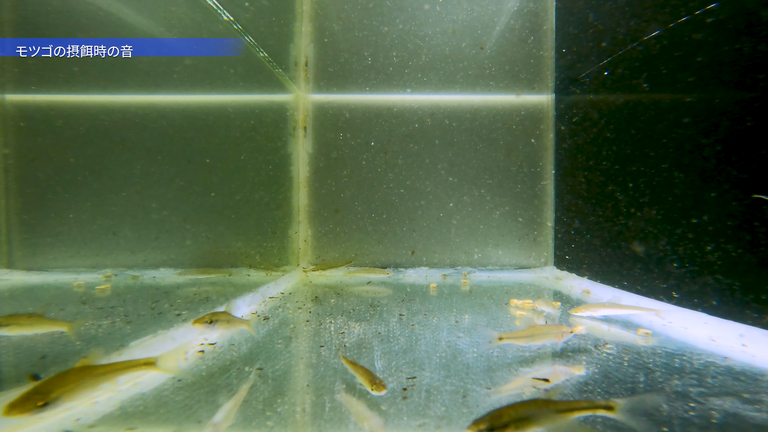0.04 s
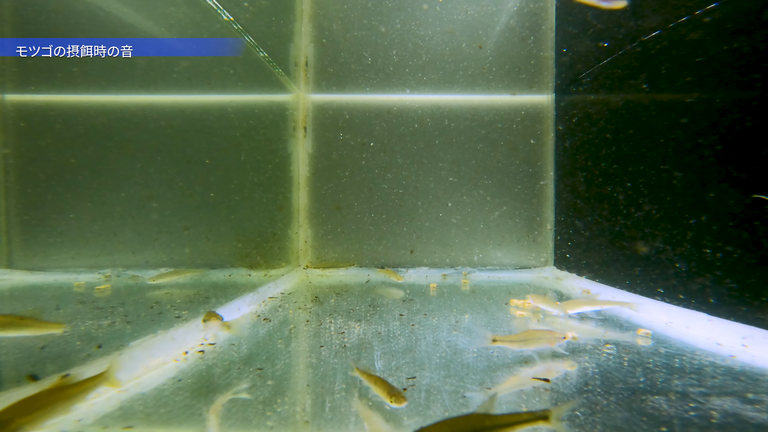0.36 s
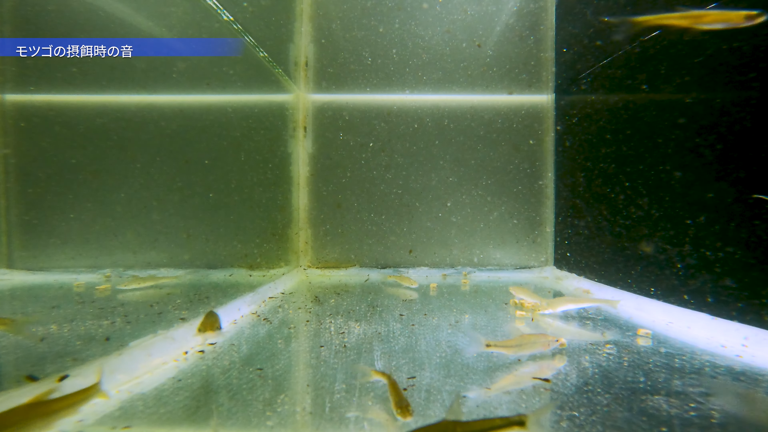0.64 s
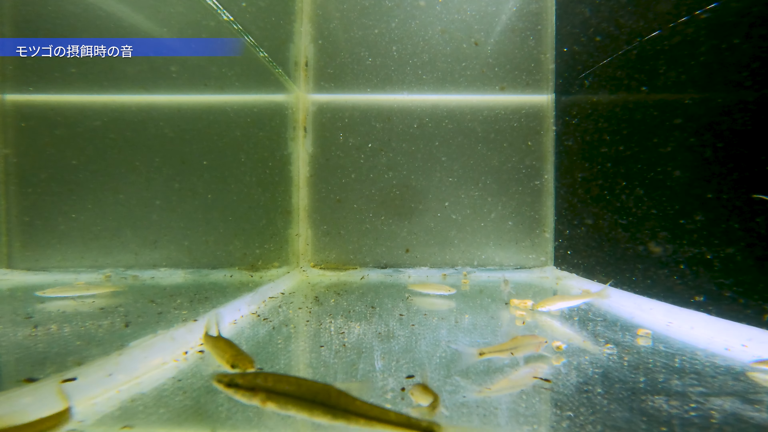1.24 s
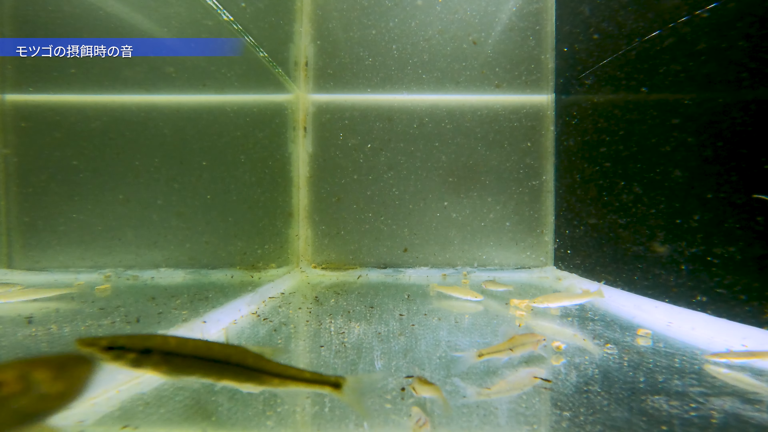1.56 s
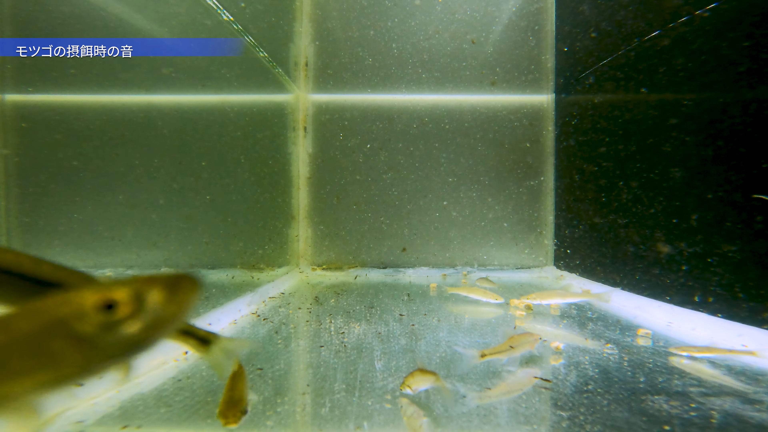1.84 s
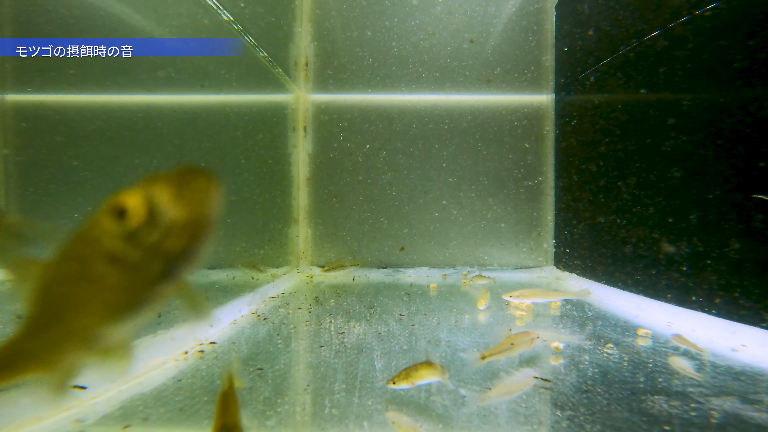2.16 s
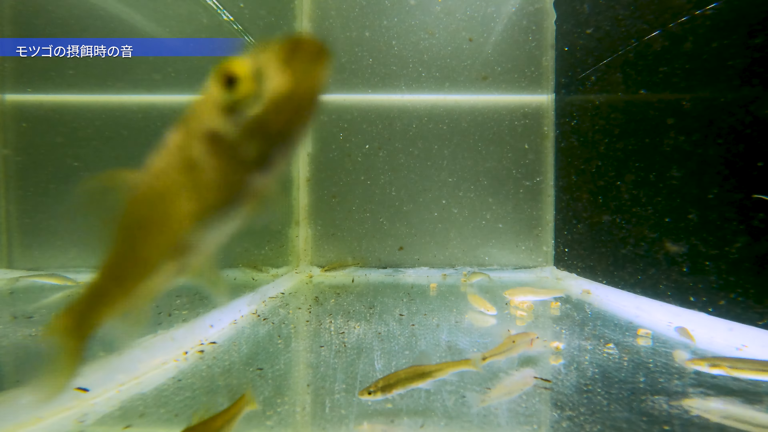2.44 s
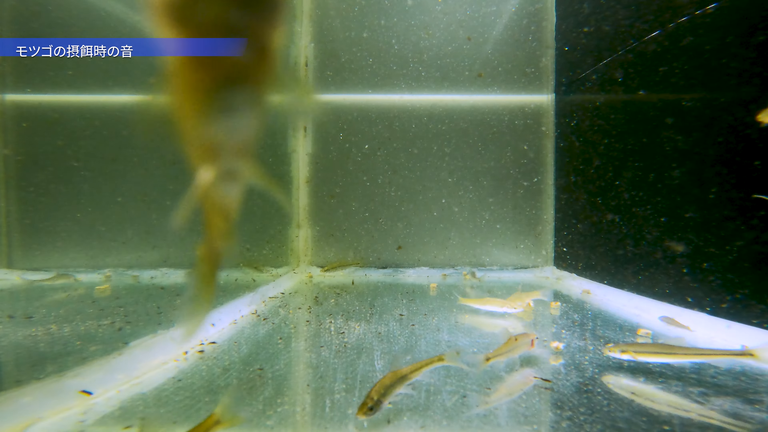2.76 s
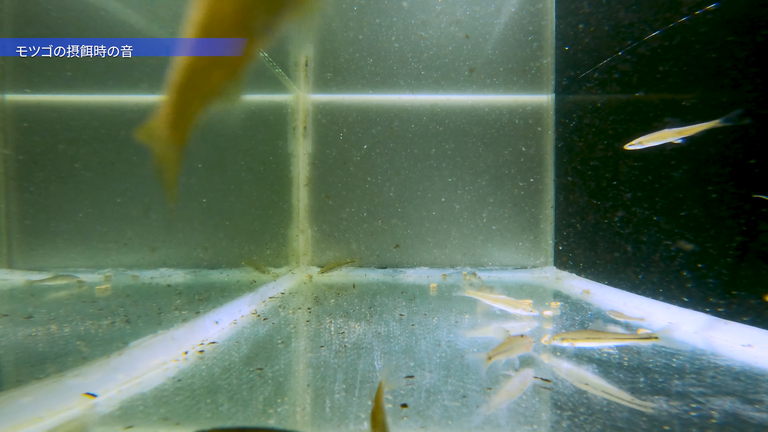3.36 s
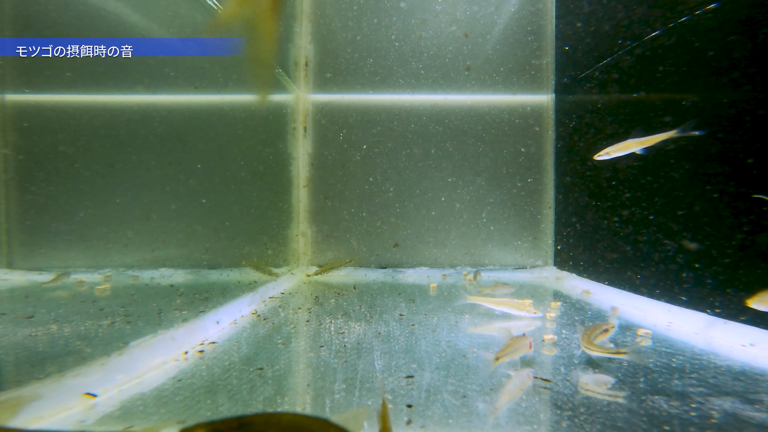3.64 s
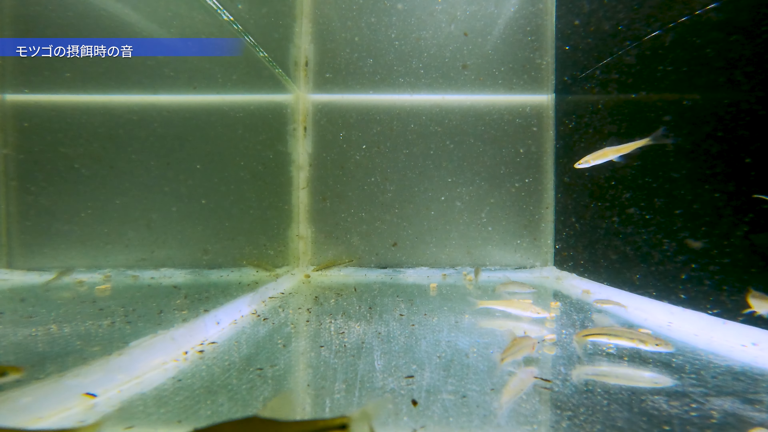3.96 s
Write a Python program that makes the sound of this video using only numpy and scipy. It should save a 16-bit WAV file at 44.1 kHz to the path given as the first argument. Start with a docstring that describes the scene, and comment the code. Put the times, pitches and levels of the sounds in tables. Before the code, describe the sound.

Sharp clicks of fish biting pellets are heard from inside an aquarium's water. One crisp crack stands out early, then after a lull comes a flurry of pecks and dull bumps, all over a deep hum and circulating water.

```python
"""Fish feeding in an aquarium

Small fish peck at food pellets in a glass tank, heard through a microphone in the water.
Each peck excites the tank's low damped modes; harder ones add a short crack and a thin high ping.
Fracturing pellets radiate bursts of noise. Beneath lie faint nibbling, a few dull bumps,
the hum of the equipment and the rumble of circulating water."""
import sys
import numpy as np
from scipy import signal
from scipy.fft import rfft, irfft
from scipy.io import wavfile
from scipy.ndimage import uniform_filter1d

SR = 44100
rng = np.random.default_rng(int(sys.argv[2]) if len(sys.argv) > 2 else 0)


def file_out(sig):
    """Save sig as 16-bit WAV at sys.argv[1]."""
    # one column per channel
    cols = np.atleast_2d(sig).T
    # limit, then scale
    lim = np.clip(cols, -1, 1)
    pcm = np.round(lim * 32767).astype(np.int16)
    wavfile.write(sys.argv[1], SR, pcm)


N = 176400
TIME = np.arange(N) / SR

KNOCK_EDGE_HZ, CRACK_EDGE_HZ, PING_EDGE_HZ = 1520, 1600, 8200   # lower for a softer contact
WASH_DB, WASH_RISE_S, WASH_T60_S = -4.5, 0.0061, 0.1
# Modes of the water-filled tank: (frequency [Hz], gain [dB], decay time T60 [s])
TANK_MODES = [(530, -1.5, 0.017), (557.7, -1.5, 0.09), (714, 3.5, 0.035), (857, 1, 0.049), (923, -7, 0.011),
              (1035, -14, 0.069), (1240, -21, 0.069)]
# Modes of the glass walls: (frequency [Hz], gain [dB], decay time T60 [s])
GLASS_MODES = [(1642, -2, .026), (1790, -12, .014), (2300, -9, .02)]
# Lower and upper ping of a hard bite: (frequency [Hz], decay time T60 [s])
BITE_MODES = [(4292, .038), (4840, .036)]
# Reflections lingering in the tank: (frequency [Hz], relative spectral density [dB])
WASH_SPECTRUM = [(200, -20), (450, 0.5), (700, 9), (1000, -5.5), (1300, -29.5), (1700, -44.5),
                 (2500, -51.5), (5000, -81.5)]
# Excitation by each peck:
# (time [s], knock [dB], crack [dB], lower ping [dB], upper ping [dB], knock pitch [ratio])
PECK_EVENTS = [(0.0147, -19, -47, -66, -84, 0.86), (0.4465, -41, -54.5, -92.5, -101.5, 1.17),
               (0.9802, -16.5, -23, -40, -68, 1.12), (0.9925, -22, -60, -72, -78, 0.98),
               (1.2755, -29.5, -51.5, -94, -100, 1), (1.2912, -24.5, -68, -90, -94, 0.97),
               (2.506, -40.5, -77, -89.5, -101, 1.3), (2.7905, -22, -48.5, -90, -91, 1.0),
               (2.948, -24, -59, -100, -97, 0.87), (2.9568, -25, -47, -90, -90.5, 1.18),
               (2.9705, -45.5, -53.5, -85.5, -91, 1.4), (3.0395, -32.5, -61, -96, -94, 1.17),
               (3.0915, -33.5, -49, -71, -94, 1.194), (3.3115, -45, -52.5, -90, -92, 1.2),
               (3.341, -31, -59, -74, -77, 1), (3.3507, -21.5, -39, -68.5, -66.5, 1.06),
               (3.4815, -43, -51, -75, -78, 1.4), (3.6245, -24, -30, -72, -65, 1.2),
               (3.6283, -16.5, -50.5, -74, -65, 0.9), (3.7755, -20.5, -55, -87, -84.5, 1.04),
               (3.7830, -23.5, -69, -88, -90, 1.0)]
def pecks():
    """Impact excitation: each peck sets damped modes ringing and leaves a reverberant wash."""
    times, knock_db, crack_db, *ping_db, pitch = np.transpose(PECK_EVENTS)
    knocks = np.zeros(N + SR)
    force = soften(signal.unit_impulse(SR // 10), KNOCK_EDGE_HZ, order=8)
    for k, start in enumerate((times * SR).astype(int)):
        modes = [(hz * pitch[k], db, t60) for hz, db, t60 in TANK_MODES]
        knocks[start:start + len(force)] += from_db(knock_db[k]) * ring(force, modes)
    pings = np.zeros(N)
    for db, (hz, t60) in zip(ping_db, BITE_MODES):
        hard_force = soften(impulses(times, db), PING_EDGE_HZ, order=6)
        pings += ring(hard_force, [(hz, 0, t60)])
    fractures = crumble(impulses(times, crack_db))
    cracks = ring(soften(fractures, CRACK_EDGE_HZ, order=3), GLASS_MODES)
    tails = decay(impulses(times, knock_db), WASH_T60_S)
    swell = soften(tails, 1 / (2 * np.pi * WASH_RISE_S), order=2)
    wash = from_db(WASH_DB) * swell * coloured_noise(WASH_SPECTRUM)
    return knocks[:N] + pings + cracks + wash


GRIND_DB, GRIND_RISE_S = -6, 0.015
CRUMBS_PER_S, CRUMB_DB, CRUMB_T60_S = 1400, -21, 0.057
def crumble(bites):
    """Acoustic emission: random microfractures grow toward each bite and die away after it."""
    grains = (rng.random(N) < CRUMBS_PER_S / SR) * rng.standard_normal(N)
    before = from_db(GRIND_DB) * decay(bites[::-1], GRIND_RISE_S)[::-1]
    after = from_db(CRUMB_DB) * decay(bites, CRUMB_T60_S)
    return bites + grains * (before + after)


CRUNCH_DB, CRUNCH_T60_S = -9, 0.063
# Dry crunch of a pellet: (frequency [Hz], relative spectral density [dB])
CRUNCH_SPECTRUM = [(600, -10), (1100, 3), (1550, 2), (2200, -7), (2700, -22), (3400, -28), (4500, -46)]
def pellet_crunch():
    """Fracture noise: with each crack the pellet emits an exponentially decaying burst."""
    times, _, crack_db, *_ = np.transpose(PECK_EVENTS)
    envelope = decay(impulses(times, crack_db), CRUNCH_T60_S)
    return from_db(CRUNCH_DB) * coloured_noise(CRUNCH_SPECTRUM, envelope)


GRIT_T60_S, TILT_PIVOT_HZ = 0.014, 4000
SPLINTERS_PER_S, SPLINTER_DB, SPRAY_T60_S, SPLINTER_T60_S = 900, -14, 0.07, 0.005
# Bright grit of a breaking pellet: (frequency [Hz], relative spectral density [dB])
GRIT_SPECTRUM = [(800, -26), (1400, -2), (2300, 5), (2900, -8), (3700, -3), (4800, -4), (5900, -14),
                 (7000, -1), (7900, -3), (8500, -14), (9600, -16), (11000, -26), (13000, -35)]
# Short bursts of grit: (time [s], level [dB], spectral tilt [dB/octave]); most are pellets breaking through,
# the one at 3.31 s is a short dull tick and the one at 3.6255 s a brief high ping
BURST_EVENTS = [(0.9802, -40.5, 0), (3.3122, -45, -21), (3.3515, -75, 0), (3.6255, -52, -13),
                (3.6293, -78, 7)]
def grit_bursts():
    """Noise bursts: a broadband burst of grit, then a dying spray of splinters, tilted darker or brighter for
    each row."""
    out = np.zeros(N)
    for time, db, tilt_db in BURST_EVENTS:
        snap = impulses(np.array([time]), db)
        breaks = rng.random(N) < SPLINTERS_PER_S / SR
        splinters = breaks * from_db(SPLINTER_DB) * decay(snap, SPRAY_T60_S)
        envelope = decay(snap, GRIT_T60_S) + decay(splinters, SPLINTER_T60_S)
        spectrum = [(hz, level + tilt_db * np.log2(hz / TILT_PIVOT_HZ)) for hz, level in GRIT_SPECTRUM]
        out += coloured_noise(spectrum, envelope)
    return out


# Rustle of mouths on food: (frequency [Hz], relative spectral density [dB])
NIBBLE_SPECTRUM = [(1000, 1.5), (1500, 7.5), (2300, -11), (2800, -23.5), (4500, -22)]
# Spells of nibbling: (centre time [s], duration [s], level [dB])
NIBBLE_EVENTS = [(0.219, 0.15, -67), (2.71, .07, -71), (2.81, .1, -63.5), (2.978, 0.13, -67),
                 (3.096, 0.077, -69), (3.355, 0.086, -58.5)]
def nibbles():
    """Modulated noise: mouths working at the food rustle in faint Gaussian swells."""
    envelope = np.zeros(N)
    for centre, duration, db in NIBBLE_EVENTS:
        envelope += from_db(db) * np.exp(-(2 * (TIME - centre) / duration) ** 2)
    return envelope * coloured_noise(NIBBLE_SPECTRUM)


# Low resonances of a bump: (frequency [Hz], gain [dB], decay time T60 [s])
LOW_MODES = [(240, 7, 0.068), (293, 1, 0.074), (413, 4, 0.073)]
# Dull bumps in the water: (time [s], excitation level [dB])
BUMP_EVENTS = [(0.648, -26), (0.661, -26), (2.802, -26.5), (2.958, -22)]
def bumps():
    """Free vibration: soft impulses excite low modes, heard as thuds in the tank."""
    times, db = np.transpose(BUMP_EVENTS)
    force = soften(impulses(times, db), edge_hz=800, order=4)
    return ring(force, LOW_MODES)


HUM_HZ = 31.1
# Envelope of the deep hum: (time [s], level [dB])
HUM_ENVELOPE = [(0.0, -46), (0.05, -17.5), (0.23, -25), (0.29, -19.5), (2.16, -25.5), (2.18, -29),
                (2.65, -21), (2.71, -26.5), (2.85, -18.5), (2.95, -29.5), (3.11, -18.5), (3.19, -32),
                (3.29, -19.5), (3.44, -28), (3.5, -21), (3.63, -32), (3.7, -27), (4.0, -24)]
# Spectral lines of the equipment's drone: (frequency [Hz], width at half amplitude [Hz], level [dB])
DRONE_LINES = [(123.3, 9.7, -30.5), (160.7, 8.3, -37.5), (194.7, 3.5, -39), (219.74, 7.9, -39.5),
               (681, 25, -44.5), (878.5, 22, -59)]
def equipment():
    """Amplitude modulation: a deep hum swells and sinks under wavering lines of narrowband noise."""
    level_db = uniform_filter1d(np.interp(TIME, *np.transpose(HUM_ENVELOPE)), size=1400)
    hum = np.sqrt(2) * np.sin(2 * np.pi * (HUM_HZ * TIME + rng.random()))
    out = from_db(level_db) * hum
    for hz, width, db in DRONE_LINES:
        line = shape_spectrum(rng.standard_normal(N), lambda f: 1 / (1 + (2 * (f - hz) / width) ** 2))
        out += from_db(db) * line / line.std()
    return out


WATER_DB = -26.5
# Circulating water: (frequency [Hz], relative spectral density [dB])
WATER_SPECTRUM = [(12, -28), (22, -15), (45, -1), (60, -9), (85, -6.5), (140, -2.5), (215, -7), (255, -18),
                  (320, -15.5), (390, -11), (660, -11), (760, -19.5), (910, -24.5), (1000, -40),
                  (1350, -53), (2000, -65.5), (3000, -77.5), (5500, -83.5), (7000, -100)]
def water():
    """Flow noise: circulating water makes a stationary low-frequency rumble."""
    return from_db(WATER_DB) * coloured_noise(WATER_SPECTRUM)


def from_db(db):
    """Logarithmic level: 20 dB is a factor of ten in amplitude."""
    return 10 ** (np.asarray(db) / 20)


def impulses(times, db):
    """Ideal impact: each contact is a single impulse."""
    x = np.zeros(N)
    np.add.at(x, (times * SR).astype(int), from_db(db))
    return x


def soften(x, edge_hz, order):
    """Low-pass filtering: a pulse spread in time loses its treble."""
    return signal.sosfilt(signal.butter(order, edge_hz, fs=SR, output="sos"), x + 1e-18)


def ring(force, modes):
    """Modal superposition: the response is a sum of damped sinusoids of alternating sign."""
    out = np.zeros(len(force))
    for k, (hz, db, t60) in enumerate(modes):
        radius = np.exp(-np.log(1000) / (t60 * SR))
        angle = 2 * np.pi * hz / SR
        feedback = [1, -2 * radius * np.cos(angle), radius * radius]
        out += (-1) ** k * from_db(db) * signal.lfilter([0, np.sin(angle)], feedback, force + 1e-18)
    return out


def decay(x, t60):
    """Exponential decay: the envelope jumps at each impulse and falls 60 dB in t60 seconds."""
    return signal.lfilter([1], [1, -np.exp(-np.log(1000) / (t60 * SR))], x + 1e-18)


def shape_spectrum(x, gain_at):
    """Spectral weighting: the gain is normalised so that white noise keeps its power."""
    gain = gain_at(np.maximum(np.fft.rfftfreq(N, 1 / SR), 1))
    return irfft(rfft(x) * gain / np.sqrt(np.mean(gain ** 2)), N)


def coloured_noise(spectrum, envelope=1):
    """Source and filter: noise is enveloped before filtering, which rounds its attacks."""
    hz, db = np.transpose(spectrum)
    source = envelope * rng.standard_normal(N)
    return shape_spectrum(source, lambda f: from_db(np.interp(np.log(f), np.log(hz), db, right=-200)))


def scene():
    """Linear superposition: all pressures add at one microphone in the tank."""
    return (pecks() + pellet_crunch() + grit_bursts() + nibbles() + bumps() + equipment() + water())[None]


CUTOFF_HZ = 13000
def record(dry):
    """Band limiting: a steep low-pass filter removes the highest treble."""
    padded = np.pad(dry, ((0, 0), (SR, 0)), mode="reflect", reflect_type="odd")   # settles the filter
    lowpass = signal.ellip(10, 0.2, 80, CUTOFF_HZ, fs=SR, output="sos")
    return signal.sosfilt(lowpass, padded)[:, SR:]


dry = scene()
out = record(dry)
file_out(out)
```